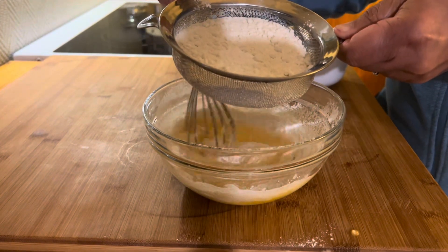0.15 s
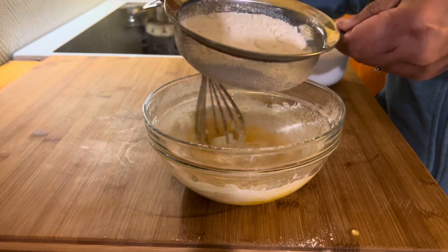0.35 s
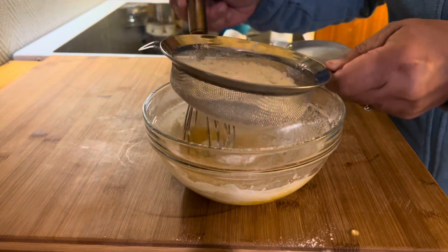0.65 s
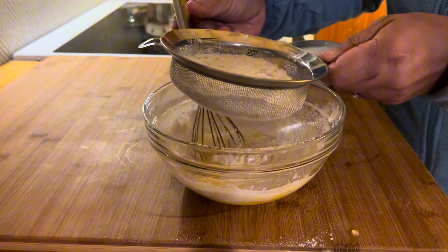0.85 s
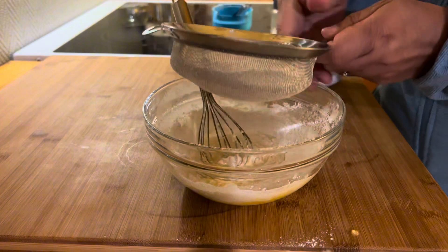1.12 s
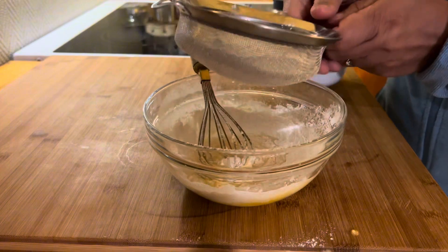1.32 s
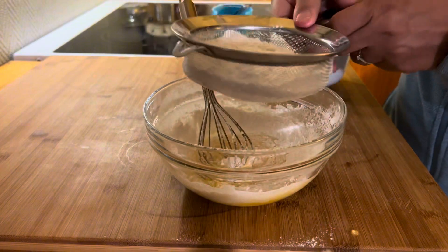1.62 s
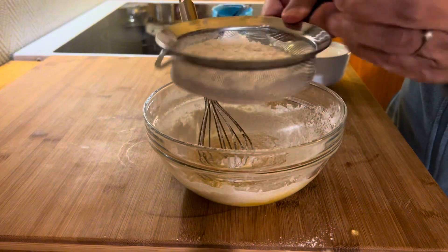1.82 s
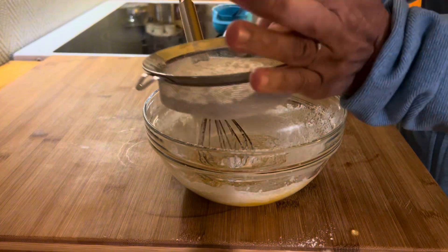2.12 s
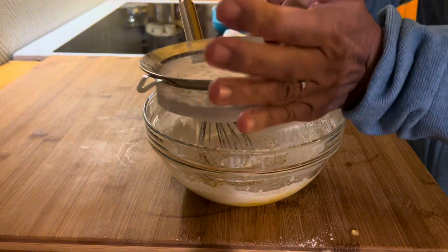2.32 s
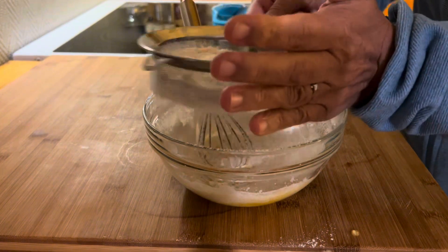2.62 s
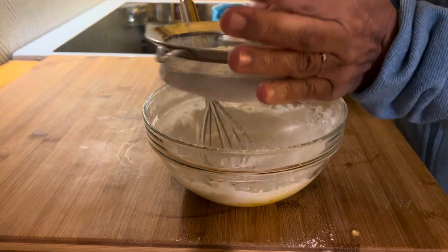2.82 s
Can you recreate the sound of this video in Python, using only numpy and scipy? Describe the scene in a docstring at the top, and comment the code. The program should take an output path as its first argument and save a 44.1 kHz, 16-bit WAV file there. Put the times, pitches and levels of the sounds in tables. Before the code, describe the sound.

Sharp metallic knocks on a hand-held flour sieve, first a quick cluster, later a duller, heavier one. A whisk stirs briefly at the start, wires ticking on a glass bowl. Faint cloth and flour rustle, low room tone, close microphone.

```python
"""A steel flour sieve is knocked with the hand over a glass bowl on a wooden counter, in a small kitchen.
Each knock rings the sieve's rim and clonks its basket as damped modes, with a noisy smack and low thuds.
Before that a whisk swishes through batter as patchy noise and stops; its wires ping, tick and touch glass.
Soft handling bumps, a sleeve's rustle and a faint hiss of flour are noise swells and damped modes.
Steady coloured noise is the room tone."""
import sys
import numpy as np
from scipy import signal
from scipy.fft import irfft
from scipy.io import wavfile
from scipy.ndimage import uniform_filter1d, map_coordinates

SR = 44100
rng = np.random.default_rng(int(sys.argv[2]) if len(sys.argv) > 2 else 0)


def waveform_to_disk(signal):
    """Save audio, clipped to [-1, 1], as 16-bit WAV at the path in sys.argv[1]."""
    frames = np.transpose(np.atleast_2d(signal))
    scaled = np.clip(frames, -1, 1) * 32767
    samples = np.round(scaled).astype(np.int16)
    wavfile.write(sys.argv[1], SR, samples)


N = 130095  # samples in the scene
T = np.arange(int(0.7 * SR)) / SR  # time axis of one contact (s)


def amp(db):
    """Turn decibels into a linear gain."""
    return 10 ** (np.asarray(db) / 20)


def unit(x):
    """Scale to rms 1."""
    return x / np.sqrt(np.mean(x ** 2) + 1e-20)


def along(points, hz):
    """Read a curve of (f/Hz, value) points on a log frequency axis."""
    f, v = np.transpose(points)
    return np.interp(np.log(hz + 1), np.log(f + 1), v)


def spectrum(points):
    """Make a gain curve over frequency from (f/Hz, level/dB) points."""
    return lambda hz: amp(along(points, hz))


def add(out, s, x):
    """Mix x into out from time s."""
    i = max(round(s * SR), 0)
    out[:, i:i + x.shape[1]] += x[:, :N - i]


# how alike noise is in the two ears: f/Hz, likeness (1 is mono)
STEREO_LIKENESS = [(60, 0.92), (250, 0.87), (1000, 0.22), (4000, 0.17), (12000, 0.17)]


def noise(gain, size):
    """Stereo noise of rms 1, coloured by gain(Hz), near mono in the bass."""
    hz = np.fft.rfftfreq(size, 1 / SR)
    turn = np.arccos(np.clip(along(STEREO_LIKENESS, hz), -1, 1)) / 2
    random_phases = np.exp(2j * np.pi * rng.random((2, len(hz))))
    mid, side = irfft(random_phases * gain(hz) * [np.cos(turn), np.sin(turn)], size)
    return unit(np.array([mid + side, mid - side]))


def fade(x, t60s):
    """Each frequency dies at its own speed."""
    hz, t, z = signal.stft(x, SR, nperseg=256)
    decay = amp(-60 * t / along(t60s, hz)[:, None])
    return signal.istft(z * decay, SR, nperseg=256)[1][:, :x.shape[1]]


def ring(modes, attack_s, waver=0, hold_s=0):
    """Damped modes, each with its own left-right balance and a random phase waver (radians)."""
    waver_rate = 148  # new random phases per second
    out = np.zeros((2, len(T)))
    for hz, db, t60, pan_db in modes:
        drift = np.interp(T * waver_rate, np.arange(len(T)), rng.standard_normal(len(T)))
        # each strike varies every mode by about 1 dB; the level holds before it dies
        level_db = db + rng.normal(0, 1) - 60 * np.maximum(T - hold_s, 0) / t60
        tone = np.sin(2 * np.pi * hz * T + waver * drift)
        out += amp([[pan_db / 2], [-pan_db / 2]]) * amp(level_db) * tone
    return out * (1 - np.exp(-2 * T / attack_s)) ** 2


def convolve_with_echoes(x, echoes, level_db):
    """Add x smeared through a noise echo pattern, at level_db."""
    pattern = unit(echoes) / np.sqrt(len(T))
    return x + amp(level_db) * signal.fftconvolve(x, pattern, axes=1)[:, :x.shape[1]]


# decay of the kitchen's tail: f/Hz, t60/s
KITCHEN_T60 = [(80, 0.48), (300, 0.27), (1500, 0.45), (5000, 0.38), (12000, 0.33)]


def kitchen(x):
    """Direct sound and the room's tail, noise that dies at its own speed in each band."""
    tail = fade(noise(np.ones_like, len(T)), KITCHEN_T60) * (1 - np.exp(-T / 0.0027))
    return convolve_with_echoes(x, tail, level_db=-8)


def grainy(depth_db, rate):
    """A random gain of rms 1 that takes a new value rate times a second."""
    flutter = map_coordinates(rng.standard_normal(N), [np.arange(N) * rate / SR], order=1)
    return unit(amp(depth_db * flutter))


def patchy(x, depth_db=3):
    """Patches of random gain, some hundred Hz wide and tens of ms long."""
    z = signal.stft(x, nperseg=512)[2]
    field = uniform_filter1d(rng.standard_normal(z.shape[1:]), size=5, axis=0)
    field = uniform_filter1d(field, size=7, axis=1)
    return unit(signal.istft(z * amp(depth_db * unit(field)), nperseg=512)[1][:, :N])


# colour of the room tone: f/Hz, level/dB
ROOM_TONE_COLOUR = [(25, -16), (70, 1), (120, -7), (200, -9), (320, -6.5), (520, -11), (700, -15),
                    (1300, -19.5), (1550, -9), (1750, -6.5), (2050, -17), (2400, -22.5), (3000, -32.5),
                    (4000, -35.5), (5500, -32), (7100, -28.5), (9800, -43.5), (12000, -36.5),
                    (16000, -67.5)]


def room_tone():
    """Steady noise, heaviest in the bass."""
    return amp(-67.5) * noise(spectrum(ROOM_TONE_COLOUR), N)


# loudness of the whisk as it stirs and stops: t/s, level/dB
WHISK_LEVEL = [(0, -57.5), (0.121, -58), (.16, -65), (.23, -60.5), (.28, -66.5), (0.333, -57.5),
               (0.379, -73.5), (.46, -102), (.55, -110)]


def whisk_level_db():
    """The stirring's level over the scene."""
    return np.interp(np.arange(N) / SR, *np.transpose(WHISK_LEVEL))


# colour of wires moving through batter: f/Hz, level/dB
SWISH_COLOUR = [(60, -2), (100, -5.5), (430, -8.5), (600, -7.5), (930, -10), (1300, -19), (1900, -5.5),
                (2500, -10), (3200, -6.5), (4200, -17.5), (6000, -19.5), (9000, -20), (12500, -26),
                (14000, -47.5), (15500, -25.5)]


def whisk_swish():
    """Wires swish through batter: patchy noise with a slow and a fine flutter."""
    flutter = grainy(depth_db=2.0, rate=47) * grainy(depth_db=1.5, rate=1000)
    return amp(whisk_level_db()) * flutter * patchy(noise(spectrum(SWISH_COLOUR), N))


# whisk against the glass: t/s, level/dB
BOWL_TOUCHES = [(0.002, -63.5), (0.081, -87), (.15, -60), (.178, -58), (.235, -64)]
# the bowl's modes: f/Hz, level/dB, t60/s, left-right balance/dB
BOWL_MODES = [(869, -2, 0.15, -8), (938, 5.5, .28, -2), (2040, -31, 0.29, -4.5), (3200, -5, 0.062, 0)]


def bowl_touches():
    """The whisk brushes the glass and sets off the bowl's damped modes."""
    out = np.zeros((2, N))
    for s, db in BOWL_TOUCHES:
        add(out, s, kitchen(amp(db) * ring(BOWL_MODES, 0.0032, waver=0.8)))
    return out


def wire_pings():
    """The wires ring faintly at random as they spring, each a single damped mode."""
    count, stir_s = 24, 0.22  # pings, all begun before this time
    centre_hz, spread_octaves = 3210, 1  # pitches reach this far up and down
    relative_db, t60_s = -1.5, 0.045  # against the swish
    level_db, out = whisk_level_db(), np.zeros((2, N))
    for when, pitch in rng.random((count, 2)):
        s = when * stir_s
        hz = centre_hz * 2 ** (spread_octaves * (2 * pitch - 1))
        add(out, s, amp(level_db[int(s * SR)] + relative_db) * ring([(hz, 0, t60_s, 0)], 0.003))
    return out


# small ticks of whisk wires and handle: t/s, level/dB
TICK_TIMES = [(.05, -55.5), (.12, -49.5), (0.1753, -53.5), (.226, -53.5), (.319, -71), (.328, -63),
              (1.997, -64.5)]
# colour of a tick: f/Hz, level/dB
TICK_COLOUR = [(500, -10), (3000, 1), (6000, -6.5), (10000, -3), (16000, -9)]


def wire_ticks(t60_s=0.02):
    """Wires and handle tick: short bursts of noise that die at once."""
    out = np.zeros((2, N))
    for s, db in TICK_TIMES:
        burst = noise(spectrum(TICK_COLOUR), len(T))
        add(out, s, kitchen(amp(db - 60 * T / t60_s) * burst))
    return out


def near_echoes(x, early_s=0.014):
    """Quick echoes from counter and bowl thicken a contact."""
    walls = noise(lambda hz: hz / (hz + 300), len(T)) * np.exp(-T / early_s)
    return convolve_with_echoes(x, walls, level_db=-11)


# colour of a contact: f/Hz, level/dB
SMACK_COLOUR = [(60, -28), (150, 10), (280, -6.5), (500, 2), (950, -3.5), (1400, -8.5), (2500, -10.5),
                (3700, -19), (5500, -16), (7500, -20), (12000, -15), (16000, -31.5)]
# decay of a contact: f/Hz, t60/s
SMACK_DECAY = [(100, .15), (600, 0.1), (2000, 0.039), (7000, 0.07), (14000, .022)]


def smack(cut_hz):
    """The brief noisy part of a contact; soft flesh dulls it above cut_hz."""
    burst = fade(noise(spectrum(SMACK_COLOUR), len(T)), SMACK_DECAY)
    burst = near_echoes(burst * (1 - np.exp(-T / 0.00056)))
    return signal.sosfilt(signal.butter(4, cut_hz, fs=SR, output='sos'), burst)


# fingers shifting on the handle: t/s, level/dB, brightness f/Hz, low mode f/Hz, low mode level/dB
HANDLING_BUMPS = [(0.1767, -51, 1430, 301, -57), (0.632, -51.5, 1290, 184.7, -46),
                  (1.074, -63, 690, 162, -55), (1.161, -58.5, 600, 147.5, -54.5),
                  (1.214, -61.5, 587, 100.5, -53), (1.261, -65, 600, 98.6, -63),
                  (1.406, -60, 1030, 290, -84), (1.46, -61, 800, 332.3, -60.5),
                  (1.996, -58.5, 4260, 329, -61), (2.357, -50, 1200, 137.5, -51),
                  (2.394, -76.5, 500, 98, -58.5)]


def handling():
    """Soft bumps of the fingers: a dull smack over two damped modes of the grip."""
    t60_s, overtone_ratio, overtone_db = 0.22, 2.2, -11
    out = np.zeros((2, N))
    for s, db, cut_hz, low_hz, low_db in HANDLING_BUMPS:
        modes = [(low_hz, 0, t60_s, 0), (low_hz * overtone_ratio, overtone_db, t60_s, 0)]
        grip = amp(low_db) * ring(modes, attack_s=0.005, waver=0.17)
        add(out, s, kitchen(amp(db) * smack(cut_hz) + grip))
    return out


def from_right(x):
    """The sieve is held to the right, so the sound reaches the left ear 0.11 ms later."""
    return np.array([np.interp(T - 0.00011, T, x[0], left=0), x[1]])


# the rim's modes: f/Hz, level/dB, t60/s, left-right balance/dB
RIM_MODES = [(1628, -11, 0.23, 3), (1665, -10.5, 0.031, -10), (2947.6, -7, 0.098, -2),
             (2957.7, -13.5, 0.048, 9.5), (4550, -8, 0.042, 14), (4592, -8, 0.093, 5.5),
             (6380, -12.5, 0.066, 15.5), (8430, -12.5, 0.076, 1), (11300, -31, 0.067, 11),
             (13150, -30, .1, 3.5), (15600, -32, 0.086, -11.5)]


def rim_ring(tilt_db):
    """The rim's damped modes, with a treble tilt per octave; a random phase waver roughens the ring."""
    tilt_from_hz = 2660  # each knock's treble tilt acts on the modes above this
    modes = []
    for hz, db, t60, pan_db in RIM_MODES:
        octaves_above = max(np.log2(hz / tilt_from_hz), 0)
        modes.append((hz, db + tilt_db * octaves_above, t60, pan_db))
    return ring(modes, attack_s=0.00081, waver=0.42, hold_s=0.0028)


# weaker modes that sound with every clonk: f/Hz, level/dB, t60/s, left-right balance/dB
CLONK_PARTNERS = [(829, -8.5, 0.12, 3), (939, -6, 0.044, -7.5), (1243, -13, 0.026, 3)]


def clonk(hz):
    """A damped main mode, whose pitch shifts with the grip, and its fixed partners."""
    main = (hz, 0, 0.082, -4.5)
    return ring([main] + list(CLONK_PARTNERS), attack_s=0.0025, waver=0.083, hold_s=0.0046)


# knocks on the sieve: t/s, rim level/dB, rim treble tilt/dB per octave, clonk level/dB, clonk f/Hz,
# smack level/dB, smack brightness f/Hz, basket level/dB
SIEVE_KNOCKS = [(0.7428, -36, -4.5, -38.5, 686.5, -39.5, 15000, -34),
                (0.7782, -34, -7, -28, 787, -28.5, 2400, -38.5),
                (0.8928, -34, -1, -29.5, 654, -32, 6440, -38), (1.061, -67.5, 6, -79, 700, -68, 5000, -56),
                (2.54, -66.5, -2.5, -48, 637, -54.5, 13000, -52),
                (2.5785, -69.5, -22, -28, 566.5, -26, 3020, -34),
                (2.599, -32, -11.5, -26, 620.5, -28, 4400, -38.5),
                (2.638, -46.5, -9.5, -42.5, 566, -37, 1600, -34),
                (2.68, -57.5, -23.5, -51.5, 650, -51, 900, -35)]
# the basket's modes: f/Hz, level/dB, t60/s, left-right balance/dB
BASKET_MODES = [(172.8, 1, 0.26, -2), (212, -14.5, 0.36, 13.5), (315.2, -3, .18, -9),
                (344.3, -9.5, 0.32, 2), (420.2, -8.5, 0.12, 5)]


def sieve_knocks():
    """Each knock of the hand rings rim and basket, with a clonk and a smack."""
    out = np.zeros((2, N))
    for s, rim_db, tilt_db, clonk_db, clonk_hz, smack_db, smack_hz, basket_db in SIEVE_KNOCKS:
        rim = amp(rim_db) * rim_ring(tilt_db)
        basket = amp(basket_db) * ring(BASKET_MODES, attack_s=0.004, waver=0.3)
        body = amp(clonk_db) * clonk(clonk_hz) + basket + amp(smack_db) * smack(smack_hz)
        add(out, s, kitchen(rim + from_right(body)))
    return out


# low thuds of hand and sieve: t/s, level/dB
THUD_TIMES = [(.765, -34), (0.795, -36), (.905, -40.5), (1.029, -49), (1.153, -50), (2.55, -36.5),
              (2.59, -29), (2.62, -29.5), (2.684, -34), (2.714, -35)]
# the thud's modes: f/Hz, level/dB, t60/s, left-right balance/dB
THUD_MODES = [(65, 5, 0.22, 1), (75.5, -1, 0.2, -2), (112, -2.5, 0.17, -4.5)]


def thuds():
    """Hand and sieve thud low: slow-starting damped bass modes."""
    out = np.zeros((2, N))
    for s, db in THUD_TIMES:
        add(out, s, amp(db) * ring(THUD_MODES, attack_s=0.023))
    return out


# soft rustles of sleeve and flour: middle t/s, half length t/s, level/dB, centre f/Hz, width/octaves
RUSTLE_SWELLS = [(0.838, 0.044, -63.5, 5130, 0.56), (1.035, 0.009, -72.5, 8100, 0.48),
                 (1.14, 0.13, -79.5, 3520, 1.2), (1.248, 0.24, -77, 18000, .12),
                 (1.49, 0.064, -79, 8000, 1.4), (1.687, 0.046, -73, 9000, 1.7),
                 (1.834, 0.046, -63.5, 1019, 1.34), (1.934, 0.011, -76, 3500, .3),
                 (2.001, 0.0049, -62.5, 3200, .3), (2.053, 0.046, -68.5, 350, 0.42),
                 (2.046, 0.065, -72.5, 2800, 0.3), (2.29, 0.13, -73, 310, .6),
                 (2.377, 0.042, -69, 1800, 0.39), (2.822, 0.036, -67, 1200, 0.76),
                 (2.825, 0.024, -74.5, 5093, 0.38)]


def rustles():
    """Swells of fine grainy noise from cloth and flour, each in its own band."""
    t, out = np.arange(N) / SR, np.zeros((2, N))
    for s, half_s, db, centre_hz, octaves in RUSTLE_SWELLS:
        band = noise(lambda hz: np.exp(-0.5 * (np.log2((hz + 1) / centre_hz) / octaves) ** 2), N)
        swell = np.exp(-0.5 * ((t - s) / half_s) ** 2)
        out += amp(db) * swell * band
    return out * grainy(depth_db=3.2, rate=330)


def scene():
    """All the layers together."""
    whisk = whisk_swish() + bowl_touches() + wire_pings() + wire_ticks()
    sieve = sieve_knocks() + thuds()
    return room_tone() + whisk + handling() + sieve + rustles()


def record(dry):
    """A steep low-pass removes what lies above 15950 Hz."""
    return signal.sosfilt(signal.ellip(10, 0.1, 90, 15950, fs=SR, output='sos'), dry)


dry = scene()
out = record(dry)
waveform_to_disk(out)
```